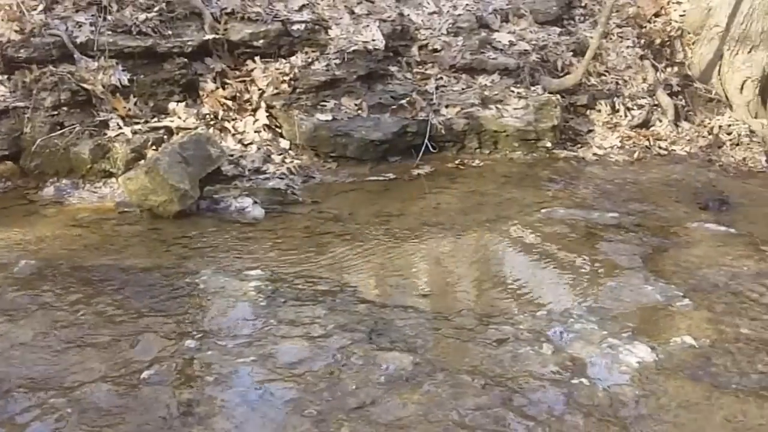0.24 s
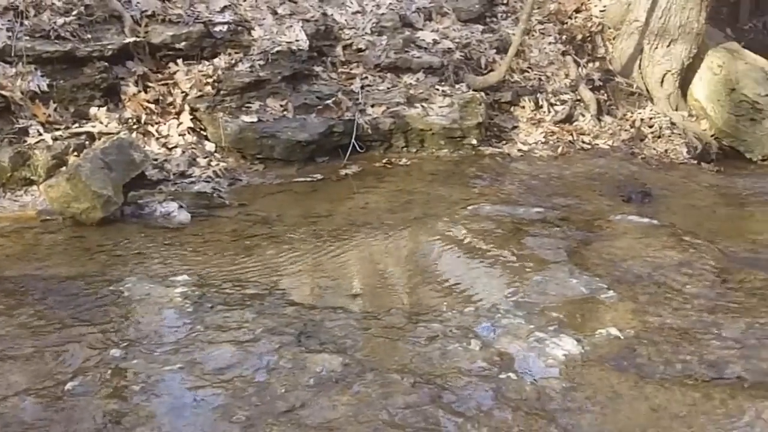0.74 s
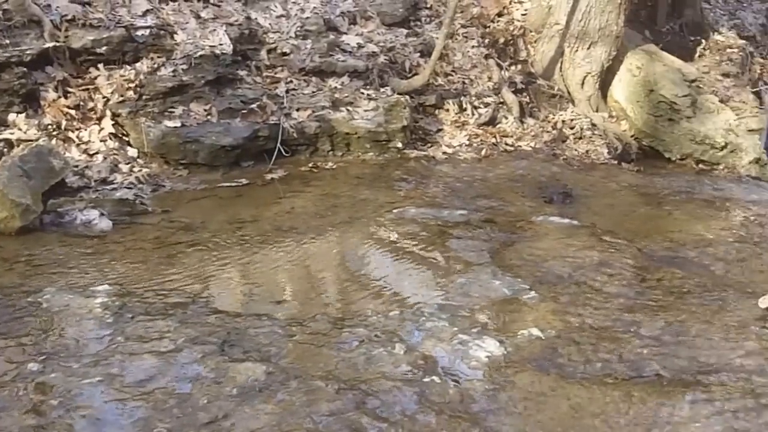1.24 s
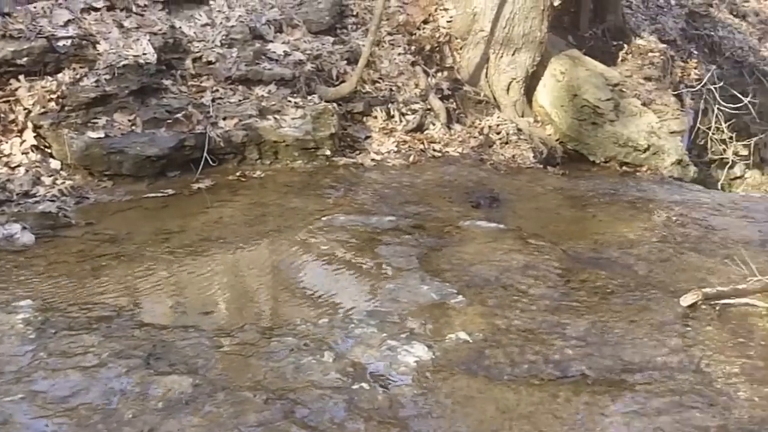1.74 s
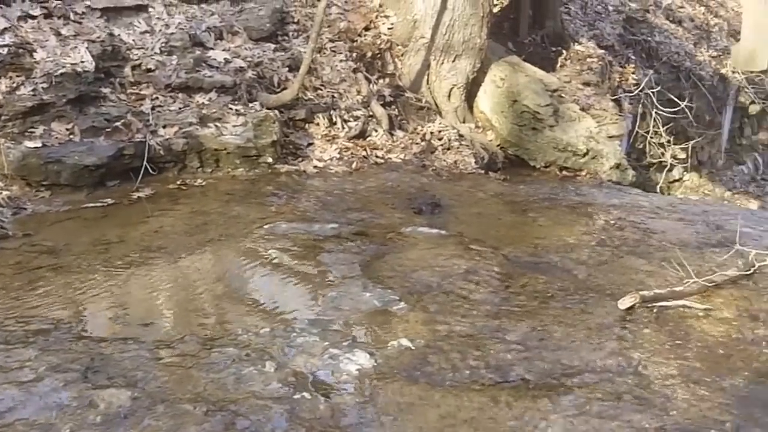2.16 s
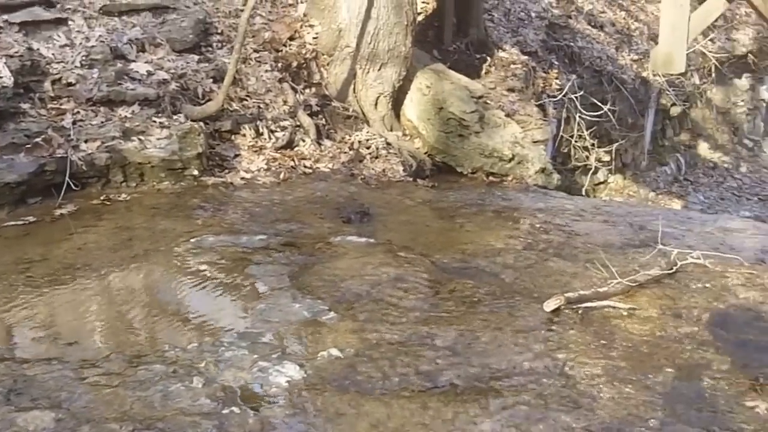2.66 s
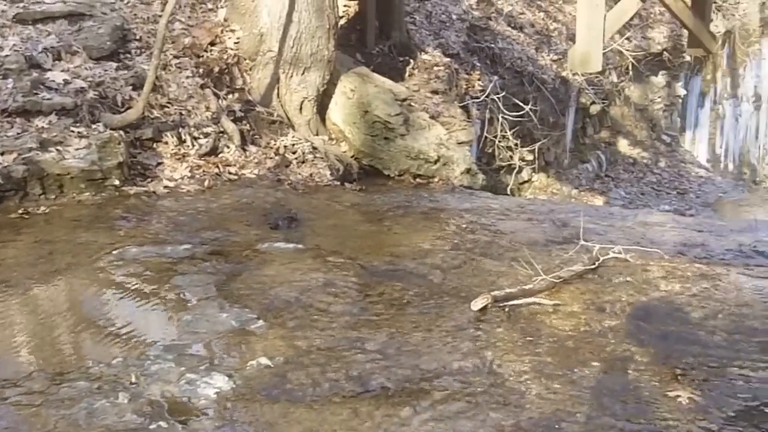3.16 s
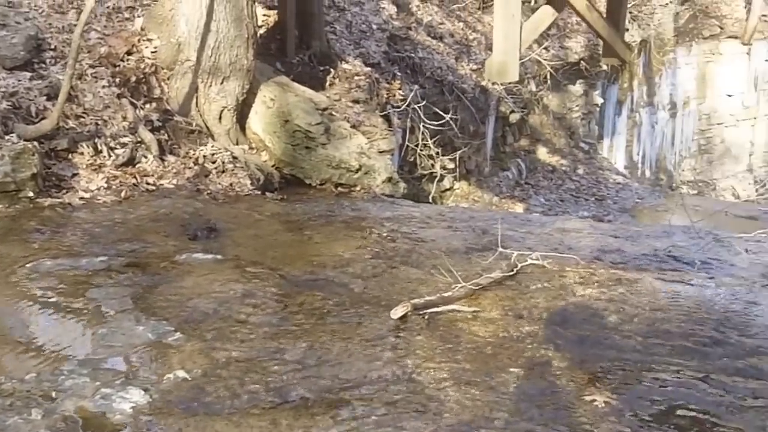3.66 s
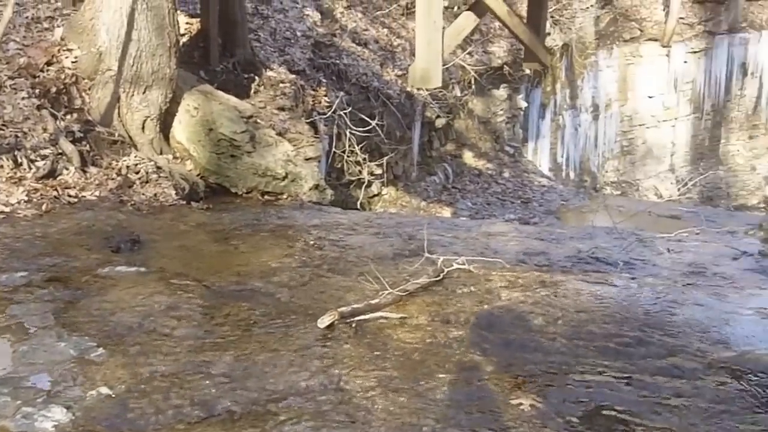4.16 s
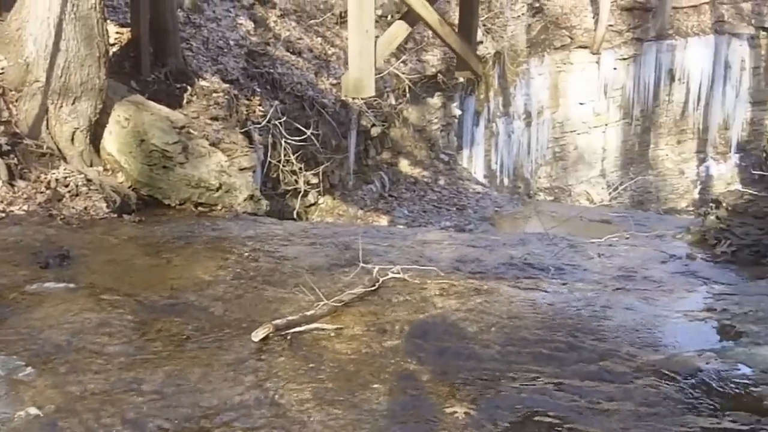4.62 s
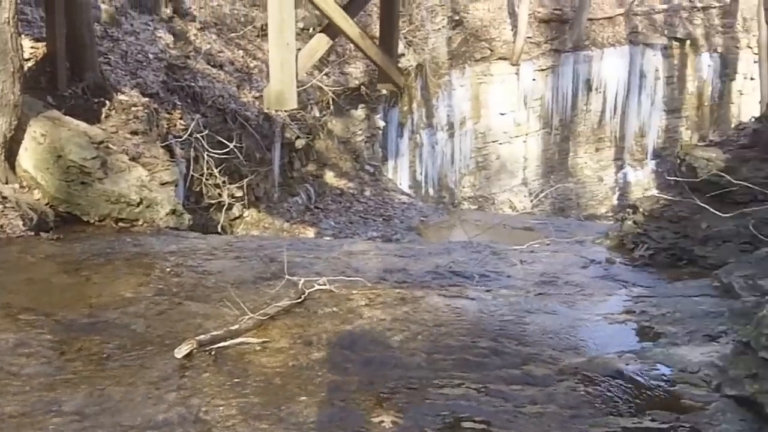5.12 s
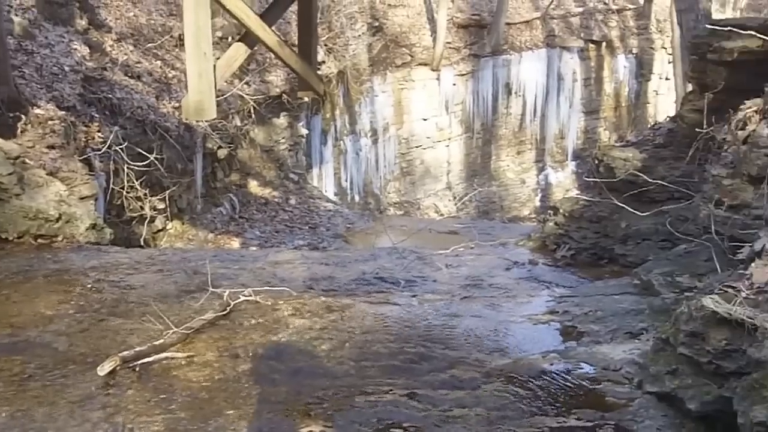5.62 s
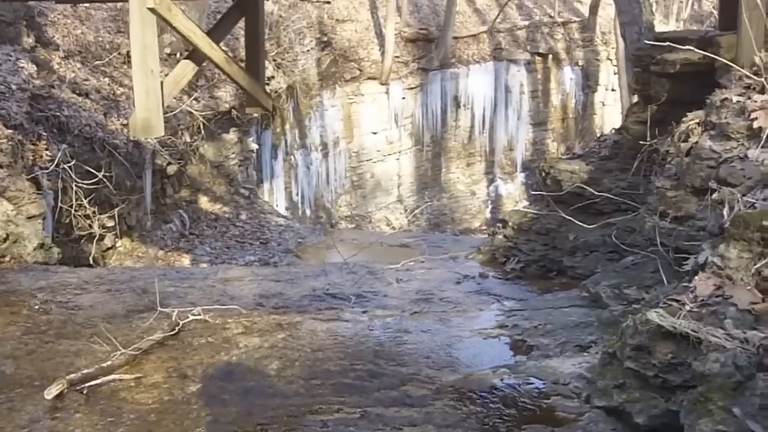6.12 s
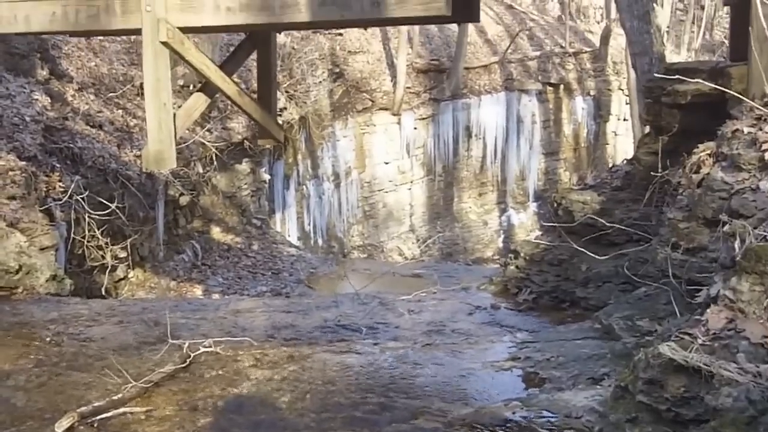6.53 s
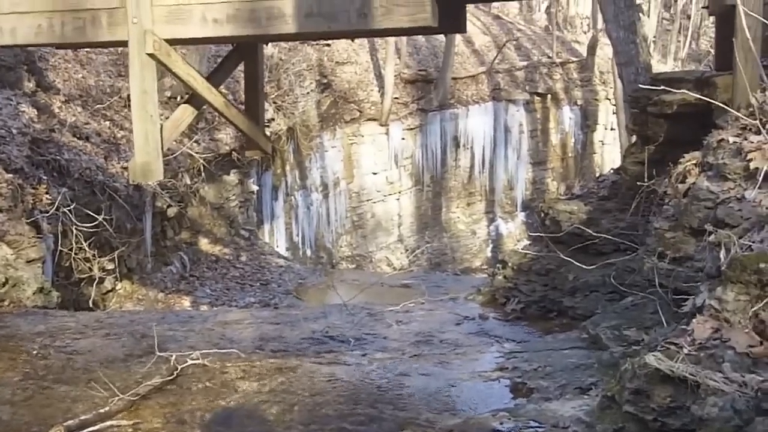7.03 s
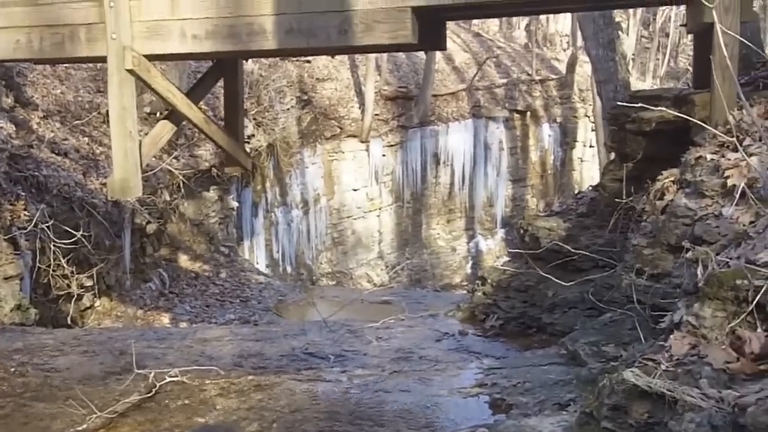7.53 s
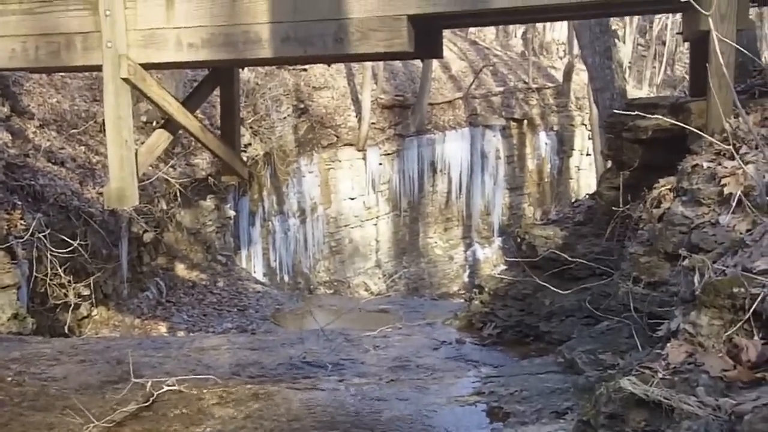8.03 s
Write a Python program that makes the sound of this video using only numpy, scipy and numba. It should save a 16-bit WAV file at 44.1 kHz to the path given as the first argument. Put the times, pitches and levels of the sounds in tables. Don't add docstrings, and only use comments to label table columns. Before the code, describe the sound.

Outdoor stream heard from the bank: continuous babbling water over stones, hollow gurgles beneath a fizzing wash, with single bubbles and droplets popping out irregularly. Low, gentle wind buffets the microphone throughout. Midway come irregular dull thumps from the hand-held case and a single brief plastic snap, after which the flow carries on unchanged. Sound is centred, close and slightly dull at the very top.

```python
import sys
import numpy as np
from scipy import signal
from scipy.fft import rfft, irfft, next_fast_len
from scipy.io import wavfile
from scipy.ndimage import uniform_filter1d, minimum_filter1d, map_coordinates
from numba import njit

SR = 44100
rng = np.random.default_rng(int(sys.argv[2]) if len(sys.argv) > 2 else 0)


def digitize_waveform(pressure):
    field = np.atleast_2d(pressure).T
    bounded = np.clip(field, -1, 1)
    quanta = np.round(bounded * 32767).astype(np.int16)
    wavfile.write(sys.argv[1], SR, quanta)


def volts_from_decibels(level):
    exponent = np.asarray(level, float) / 20
    return 10 ** exponent


N = 365009

SNAP_S = 4.2354


def over_time(s, values):
    return np.interp(np.arange(N) / SR, s, values)


def walk(rate):
    spacing = SR / rate
    levels = rng.standard_normal(int(N / spacing) + 2)
    coarse = map_coordinates(levels, [np.arange(0, N + 64, 64) / spacing], order=3)
    return coarse.repeat(64)[:N]


def shape(x, points):
    hz, db = np.transpose(points)
    size = next_fast_len(N)
    bins_hz = np.arange(size // 2 + 1) * SR / size
    gain = volts_from_decibels(np.interp(np.log(bins_hz + 1), np.log(hz), db))
    y = irfft(rfft(x, size) * gain, size)[:N]
    return y / np.std(y)


def band(x, lo_hz, hi_hz):
    return signal.sosfilt(signal.butter(2, [lo_hz, hi_hz], "band", fs=SR, output="sos"), x)


@njit
def grains(rows, glide, rise):
    out = np.zeros(N)
    for s, hz, t60, a in rows:
        n, start = int(t60 * SR), int(s * SR)
        fade = np.exp(-np.log(1000.) / n)
        step = 2 * np.pi * hz / SR
        onset = np.exp(-hz / SR / rise)
        phase, left = 0., 1.
        for i in range(start, min(start + n, N)):
            out[i] += a * (1 - left) * np.sin(phase)
            a, left = a * fade, left * onset
            phase += step * (1 + glide * (i - start) / n)
    return out


def swarm(count, lo_hz, hi_hz, cycles, scatter_db, glide, rise, bunch_db):
    u = rng.random((count, 4)).T
    busy = np.cumsum(volts_from_decibels(bunch_db * walk(30)))
    s = np.interp(u[0], busy / busy[-1], np.arange(N) / SR)
    hz = lo_hz + (hi_hz - lo_hz) * u[1]
    t60 = cycles * (.5 + u[3]) / hz
    size = volts_from_decibels(-scatter_db * np.log(1.006 - u[2])) * np.sqrt(hz)
    x = grains(np.column_stack([s, hz, t60, size]), glide, rise)
    return x / np.std(x)


def strays(table, count, db, lo_hz, hi_hz):
    u = rng.random((count, 3)).T
    extra = np.column_stack([u[0] * N / SR, db - 6 * u[1], lo_hz * (hi_hz / lo_hz) ** u[2]])
    return np.vstack([table, extra])


def banks(x, t60, wet_db):
    t = np.arange(4096) / SR
    tail = rng.standard_normal(4096) * np.exp(-np.log(1000) * t / t60) * (t > .002)
    tail = tail / np.sqrt(np.sum(tail ** 2))
    return x + volts_from_decibels(wet_db) * signal.fftconvolve(x, tail)[:N]


def water():
    # frequency in Hz, level in dB per Hz.
    water_colour = [(180, -17.5), (300, -4), (430, -4.5), (680, -1.5), (850, -2.5), (1050, -3),
                    (1700, -2.5), (2500, -5), (3600, -5), (4800, -8), (6400, -10.5), (8000, -16.5)]
    # lowest and highest bubble pitch in Hz, level in dB.
    hollows = [
        (475.7, 800, -5.5),
        (859, 1251, -4.5),
        (1374, 1900, -5.5),
    ]
    # time in s, lead of that hollow in dB.
    turn = [(0, 0), (.6, 2), (1.3, 3), (2.4, 3.5), (2.9, 0), (4.8, 1.5), (5.6, -1), (8.28, -2)]
    bubbles = swarm(count=12000, lo_hz=250.2, hi_hz=5630, cycles=35.0, scatter_db=2.5,
                    glide=.25, rise=1.8, bunch_db=2.5)
    fizz = swarm(count=12000, lo_hz=1553, hi_hz=7970, cycles=8.4, scatter_db=3.5,
                 glide=.15, rise=0.61, bunch_db=4.)
    near = banks(volts_from_decibels(-5.5) * bubbles + volts_from_decibels(-8.5) * fizz, t60=0.036, wet_db=-4.5)
    flow = shape(volts_from_decibels(-1.5) * rush() + near, water_colour)
    flow += (volts_from_decibels(1.2 * walk(70)) - 1) * band(flow, 5500, 8000)

    gurgle_db, swing_db, gurgles_per_s = -44.8, 1.6, 3.5
    chains = 0
    leads_db = (over_time(*np.transpose(turn)), 0, 0)
    for (lo_hz, hi_hz, db), lead_db in zip(hollows, leads_db):
        chain = swarm(count=800, lo_hz=lo_hz, hi_hz=hi_hz, cycles=34.3, scatter_db=2.5,
                      glide=.2, rise=1.3, bunch_db=3.5)
        chain_db = gurgle_db + db + lead_db + swing_db * walk(gurgles_per_s)
        chains = chains + volts_from_decibels(chain_db) * chain

    flow_db, surge_db, surges_per_s = -34.8, .4, 3
    flow = volts_from_decibels(flow_db + surge_db * walk(surges_per_s)) * flow
    return flow + banks(chains, t60=0.066, wet_db=-5.5)


def rush():
    out, shared = 0, walk(25)
    for hz in 160 * 2 ** np.arange(0, 6, .5):
        shared = 0.65 * shared + 0.52 * walk(25)
        flicker = volts_from_decibels(.8 * shared + .6 * walk(9))
        out = out + flicker * band(rng.standard_normal(N), hz / 2 ** .25, hz * 2 ** .25)
    return out / np.std(out)


def drops():
    # start in s, peak in dB, pitch in Hz.
    single_bubbles = [(0.064, -25, 1180), (0.417, -22, 3860), (0.483, -24, 1670), (0.52, -23, 990),
                      (0.627, -23, 1060), (0.725, -26, 1085), (0.828, -22, 1500), (1.083, -17.5, 963),
                      (1.197, -23, 1010), (1.46, -22, 2940), (1.493, -24, 729), (1.646, -20, 1076),
                      (1.684, -21, 1620), (2.221, -20, 1860), (2.559, -21, 3050), (3.303, -21, 3130),
                      (3.384, -15, 1485), (4.103, -18, 4880), (4.311, -21, 2800), (4.648, -22, 1120),
                      (4.875, -19, 1100), (5.274, -22, 2030), (5.502, -21.5, 2010), (6.4, -19, 1450),
                      (6.447, -24, 1530), (6.922, -15, 2320), (7.095, -22, 3620), (7.808, -25, 2900),
                      (7.943, -22, 910), (8.154, -18, 1210)]
    # start in s, peak in dB, pitch in Hz.
    spray = [(0.2723, -31, 6060), (0.4095, -27.5, 6300), (0.4708, -28, 6250), (0.9787, -32, 5900),
             (1.2514, -29, 6550), (1.4601, -33, 6810), (1.7255, -32, 6000), (1.7727, -28, 6730),
             (2.1929, -24, 6230), (2.5671, -28, 6630), (2.7057, -24, 6700), (2.783, -32.5, 6720),
             (2.8739, -28, 6650), (2.9572, -30, 6340), (3.078, -27, 6130), (3.8621, -29, 6900),
             (3.9544, -31, 6370), (4.235, -20.5, 7100), (4.5655, -28, 6430), (4.7227, -33, 6100),
             (5.2265, -32, 6290), (5.365, -30, 6500), (5.904, -31, 6870), (6.1838, -32, 6120),
             (6.5839, -33, 6800), (6.6722, -29, 5920), (7.3332, -31.5, 6660), (7.637, -28.5, 6800),
             (7.7613, -32, 6510), (7.9818, -24, 7360)]
    s, db, hz = strays(single_bubbles, count=12, db=-27, lo_hz=950, hi_hz=2100).T
    t60 = .033 + .0003 * (db + 22)
    t60 = np.clip(t60 * (1000 / hz) ** 0.85, .005, .1)
    big = grains(np.column_stack([s, hz, t60, volts_from_decibels(db - 2.0)]), 0.083, 0.8)

    bursts = strays(spray, count=12, db=-32, lo_hz=5900, hi_hz=7000)
    s, db, hz = np.repeat(bursts, 2, axis=0).T
    hz = hz * (0.926 + .12 * rng.random(len(s)))
    small = grains(np.column_stack([s, hz, 0.005 + 0 * s, volts_from_decibels(db + 2.6)]), 0.22, 1.2)
    before_or_after_snap = abs(np.arange(N) / SR - SNAP_S) > .012
    return banks(big + (small + splashes()) * before_or_after_snap, t60=0.072, wet_db=-6.5)


def splashes():
    # start in s, peak in dB, centre pitch in Hz.
    near_splashes = [(0.1007, -23, 2650), (0.483, -19.5, 3210), (0.9158, -22.5, 3360), (1.1967, -24, 2500),
                     (1.4604, -23.5, 2870), (1.7, -22, 3340), (1.9779, -24, 2750), (2.102, -21, 3480),
                     (2.4034, -23, 3120), (2.451, -21.5, 3370), (2.6662, -23, 2430), (2.7836, -21, 3100),
                     (2.8886, -21, 3560), (3.381, -19, 3320), (3.4158, -16.5, 3750), (3.8711, -21, 2570),
                     (3.9544, -20, 3070), (4.2343, -15, 2730), (4.4496, -20, 4410), (4.5805, -23, 2780),
                     (4.8928, -18, 4010), (4.9955, -20, 2590), (5.062, -23, 3240), (5.203, -20.5, 4020),
                     (5.5014, -21, 3220), (6.3994, -19, 4060), (7.096, -22, 3850), (7.541, -17.5, 4840),
                     (8.085, -20, 4900)]
    s, db, hz = np.repeat(strays(near_splashes, count=16, db=-24, lo_hz=2400, hi_hz=3900), 5, axis=0).T
    u = rng.random((len(s), 2)).T
    hz = hz * 2 ** (.7 * (u[1] - .5))
    return grains(np.column_stack([s + .004 * u[0], hz, 20 / hz, volts_from_decibels(db - 5)]), 0.21, 0.37)


def case():
    # time in s, peak in dB, length of the push in ms.
    knocks = [(2.372, -24, 3), (2.443, -28, 1.7), (2.853, -20, 1.1), (2.8844, -19, 0.71),
              (2.8944, -11, 0.59), (2.9125, -18.5, 2), (2.948, -23, 1.2), (3.1051, -13, 1.7),
              (3.1398, -19.5, 0.68), (3.4974, -12.5, 0.52), (3.5147, -13.5, 0.61), (3.657, -20.5, 1.5),
              (3.7299, -22, 1.3), (3.8655, -20, 1.5), (4.059, -13.5, 0.51), (4.1293, -15, 0.86),
              (4.278, -28.5, 0.88), (4.6327, -17, 1), (4.6735, -16.5, .8), (4.8484, -14.5, 0.94),
              (4.958, -26.5, 0.58)]
    # frequency in Hz, level in dB, t60 in s.
    case_modes = [
        (102.6, -1.5, 0.02),
        (185, -23, 0.018),
        (1140, -19.5, 0.0065),
    ]
    # frequency in Hz, level in dB, t60 in s.
    latch_modes = [(1290, -4.5, .007), (1720, 0.5, 0.0075), (2770, -3, .004), (3540, -2.5, .004),
                   (4500, -1, 0.0047), (5960, -1, .003), (7200, -1.5, .003)]
    out = np.zeros(N)
    t = np.arange(-200, 2400) / SR
    after = t - .0012
    swing = sum(volts_from_decibels(db) * np.cos(2 * np.pi * hz * after) * 1000 ** (-after / t60)
                for hz, db, t60 in case_modes)
    for s, db, ms in knocks:
        pull = np.exp(-abs(t / (0.00047 * ms)) ** 1.85)
        release = .5 + .5 * np.tanh((t - 0.00084 * ms) / (0.00051 * ms))
        out[int(s * SR) - 200:][:len(t)] += volts_from_decibels(db) * (release * swing - pull)

    hz, db, t60 = np.transpose(latch_modes)
    snap_db = -12
    # (delay in s, level in dB)
    for late_s, late_db in ((0, -2.5), (.0005, -1), (.0011, 4), (.0018, -3), (.0024, -3)):
        start_s = SNAP_S + late_s + rng.random(len(hz)) / hz
        size = volts_from_decibels(snap_db + late_db + db - 7)
        out += grains(np.column_stack([start_s, hz, t60, size]), 0., 0.087)
    return out


def wind():
    # frequency in Hz, level in dB per Hz.
    wind_colour = [(2, -16), (9, -2.5), (20, -0.5), (32, -4), (70, -11), (120, -20.5), (240, -32),
                   (500, -52)]
    # time in s, rumble level in dB.
    gusts = [(0, -33.5), (.7, -34.5), (1.35, -32.5), (1.75, -35), (2.5, -31), (3.2, -33), (3.9, -34),
             (4.6, -32), (5.4, -32), (6.2, -32.5), (6.8, -34.5), (7.4, -33), (8.28, -34)]
    gust_db = over_time(*np.transpose(gusts)) + .6 * walk(7)
    return volts_from_decibels(gust_db + 1.5 + 1.4 * walk(12)) * shape(rng.standard_normal(N), wind_colour)


def scene():
    mono = water() + drops() + wind() + case()
    return np.array([mono, mono])


def hold(x):
    return uniform_filter1d(-minimum_filter1d(-x, size=int(.05 * SR)), size=400)


def burst_grit(sound):
    # frequency in Hz, level in dB per Hz.
    grit_colour = [(15, -3), (60, -2.5), (150, -5.5), (330, -11), (700, -15), (860, -23.5), (930, -50)]
    # frequency in Hz, level in dB per Hz.
    hum_colour = [(10, -1.5), (30, -5.5), (100, -13.5), (250, -32), (450, -40.5), (600, -67)]
    # frequency in Hz, level in dB per Hz.
    edge_colour = [(5300, -59), (5420, -5), (5600, -1), (5700, -61.5), (7300, -60.5), (7500, 8.5),
                   (7750, -6), (7850, -18), (8300, -21.5), (8500, -59)]
    power = band(sound, 5800, 7300) ** 2 + 1e-12
    quick = uniform_filter1d(power, size=128)
    slow = uniform_filter1d(power, size=4096)
    jump_db = 10 * np.log10(quick / slow)
    burst = hold(.5 + .5 * np.tanh((jump_db - 4.3) / .5))
    grit = burst * volts_from_decibels(-57 + 2.5 * walk(40)) * shape(rng.standard_normal(N), grit_colour)
    grit += volts_from_decibels(-54) * shape(rng.standard_normal(N), hum_colour)
    edge_level = np.sqrt(hold(quick)) * volts_from_decibels(-27 + 2.2 * walk(60))
    edge_hiss = burst * edge_level * shape(rng.standard_normal(N), edge_colour)
    return edge_hiss + np.array([grit, -grit])


def top_cut(x):
    return signal.sosfilt(signal.butter(12, 8610, fs=SR, output="sos"), x)


def record(dry):
    offset = [
        [.0813],
        [-.0105],
    ]
    gap = signal.lfilter(*signal.iirnotch(SR / 8, 5.5, SR), dry)
    cut = signal.sosfilt(signal.ellip(10, .3, 60, 7400, fs=SR, output="sos"), gap)
    mix = cut + offset + burst_grit(cut[0])
    return top_cut(mix)


dry = scene()
out = record(dry)
digitize_waveform(out)
```